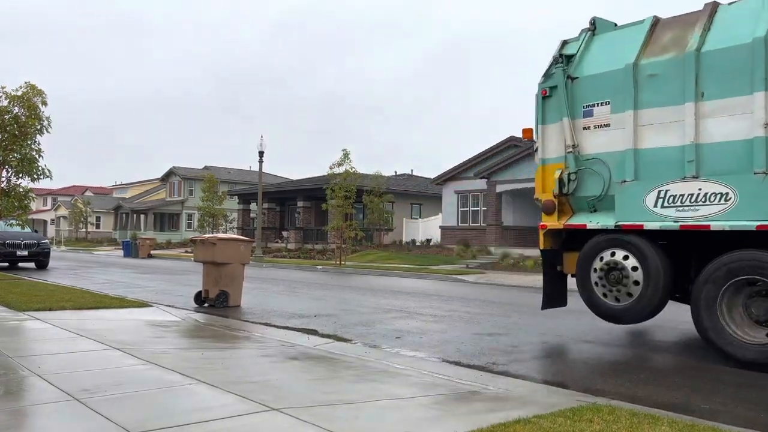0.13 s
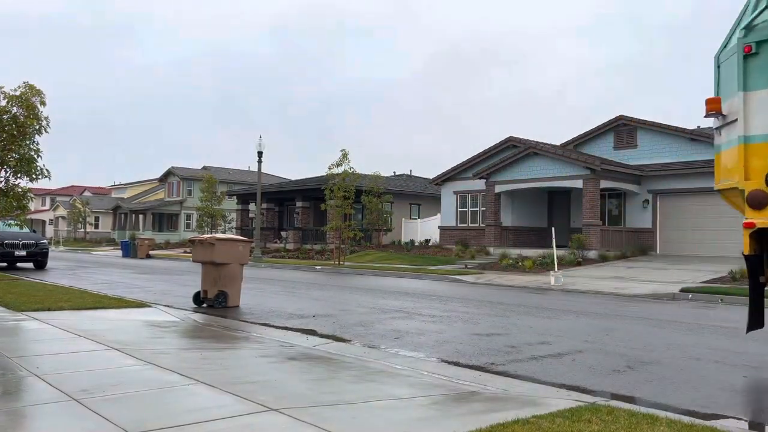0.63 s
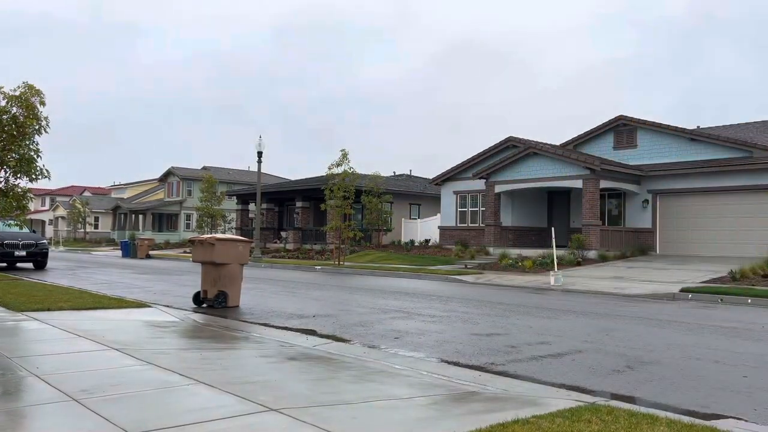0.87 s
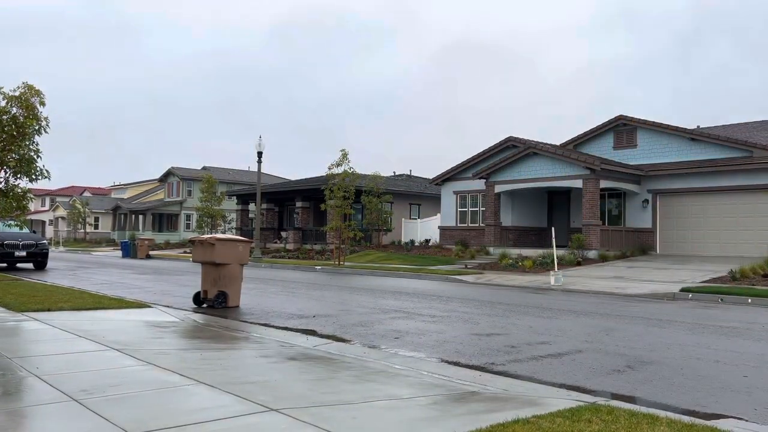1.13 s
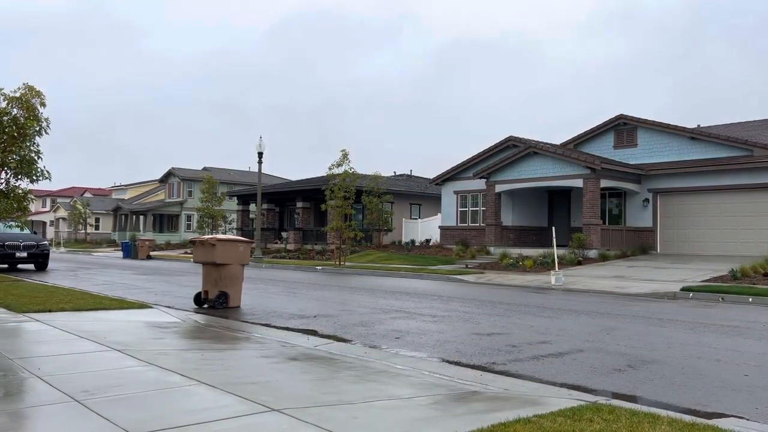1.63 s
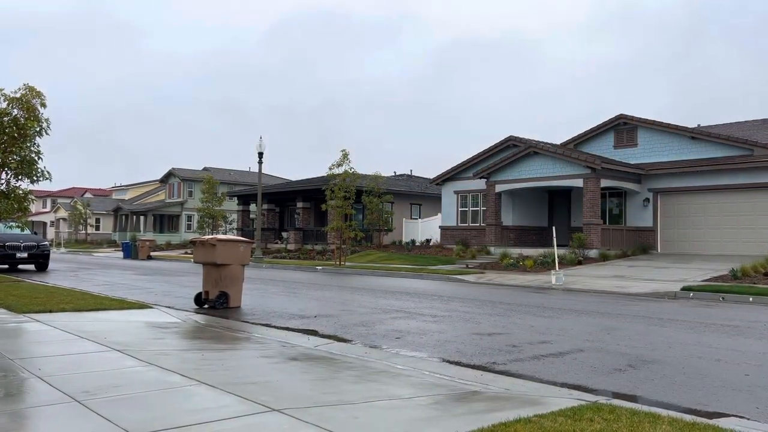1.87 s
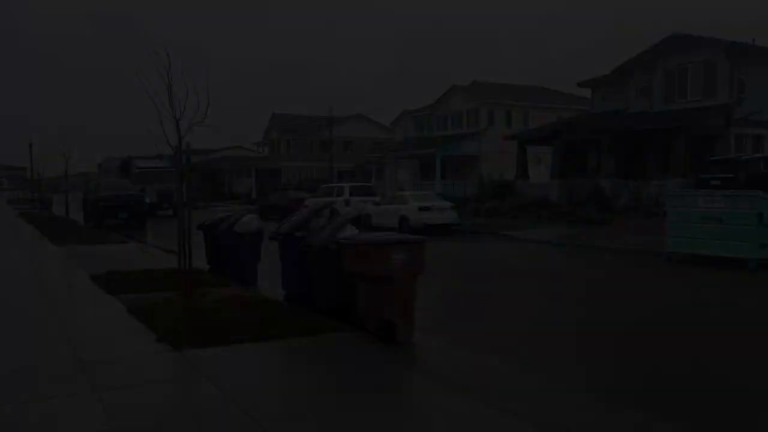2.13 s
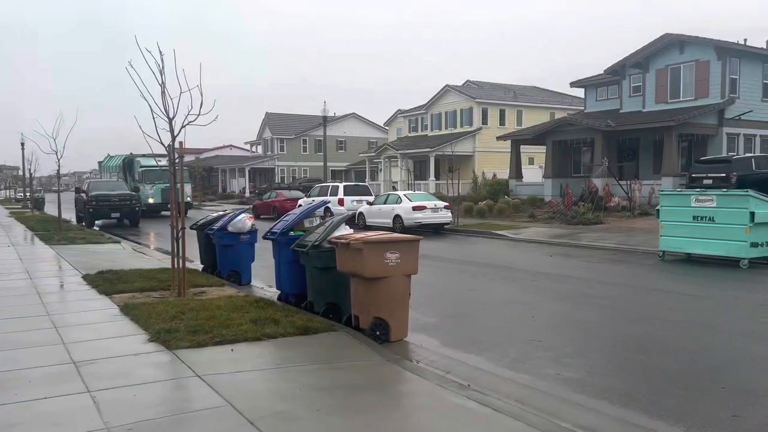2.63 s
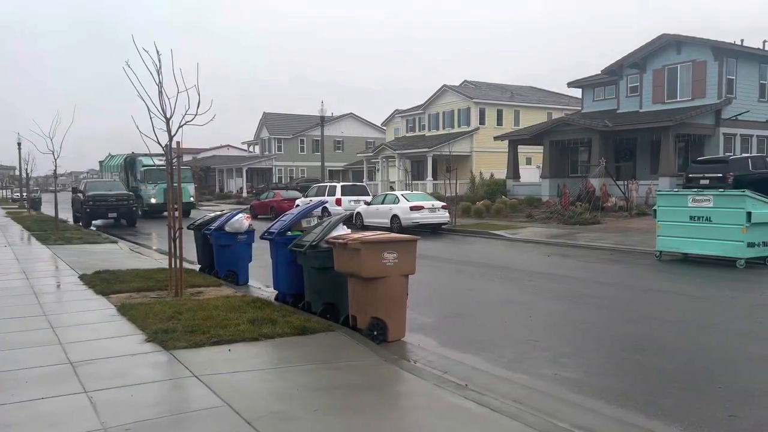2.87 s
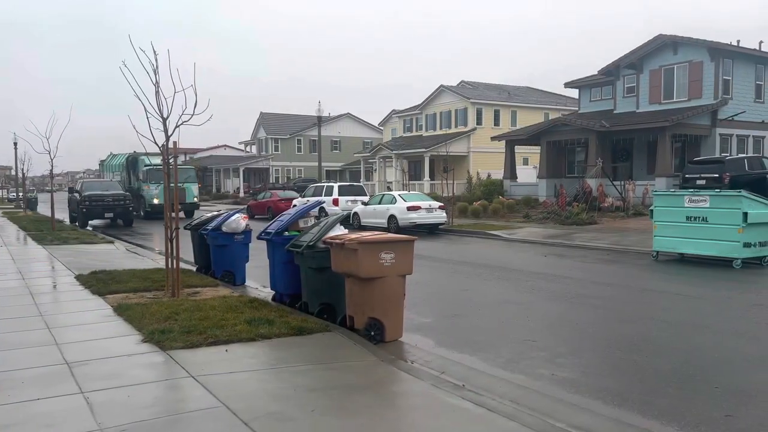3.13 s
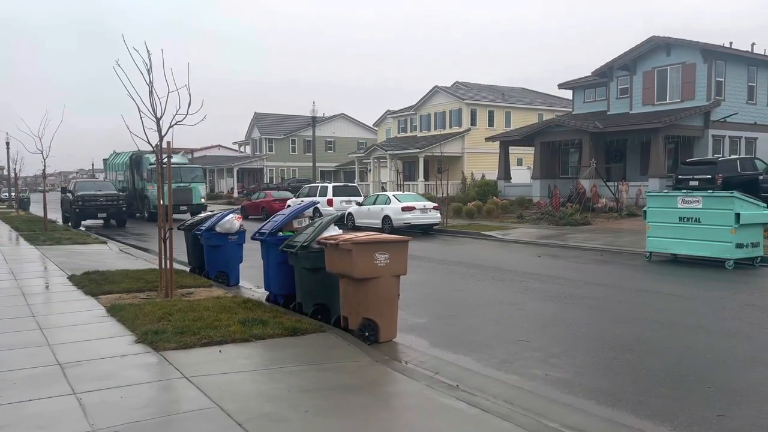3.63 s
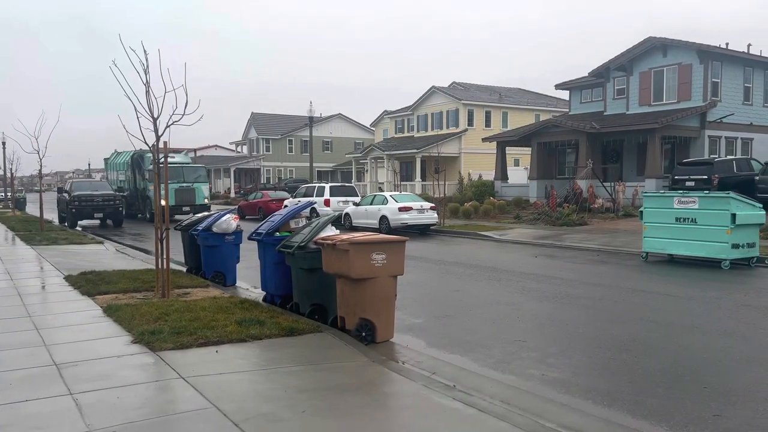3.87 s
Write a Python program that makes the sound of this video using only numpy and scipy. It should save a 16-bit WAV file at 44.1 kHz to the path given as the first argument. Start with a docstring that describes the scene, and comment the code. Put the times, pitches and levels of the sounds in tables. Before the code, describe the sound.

Garbage truck engine roars and whines past nearby, vents air, then cuts to a quieter distant drone

```python
"""Refuse truck leaving, then approaching

A refuse truck drives off along a wet suburban street close by; after a quick fade the same truck
approaches from far away. Engine and hydraulic pump are wavering sines at multiples of their rates, gears and
turbo whine as single lines, fan and tyre roar is noise in flickering bands, short mechanical tones come and go.
Close by, air vents as a noise burst and the brake squeals in gliding tones. Two spaced microphones.
"""
import sys
import numpy as np
from scipy import signal
from scipy.fft import rfft, irfft
from scipy.io import wavfile

SR = 44100
rng = np.random.default_rng(int(sys.argv[2]) if len(sys.argv) > 2 else 0)


def store_wav(level_fs):
    """Save 16-bit WAV to argv[1]."""
    pcm = np.round(np.clip(np.atleast_2d(level_fs), -1, 1) * 32767)
    wavfile.write(sys.argv[1], SR, pcm.T.astype(np.int16))


def elevation(decibels):
    """Turn decibel levels (scalar or array-like) into linear amplitude ratios."""
    levels = np.asarray(decibels, float)
    return 10 ** (levels / 20)


N = 176400

# near noise spectrum before band levels: f/Hz, density/dB re 1 per Hz
NEAR_SPECTRUM = [(35, -65), (60, -51), (120, -50.5), (200, -52), (300, -53.5), (400, -54.5), (600, -59.5),
                 (800, -58.5), (1100, -60), (1400, -60), (1700, -60.5), (2000, -65), (2300, -64),
                 (2600, -68), (3000, -70), (3600, -73), (4300, -71), (5000, -69.5), (5800, -69.5),
                 (6400, -72.5), (7000, -80), (7500, -77), (8500, -78), (9500, -80.5), (10500, -81.5),
                 (11000, -80.5), (11600, -82.5), (12850, -90), (14450, -92), (15700, -92), (15950, -140)]
# near stereo, phase stepped above 9.5 kHz:
# f/Hz, left-right likeness (stereo() caps it), right's phase lead/rad, left minus right/dB
NEAR_STEREO = [(60, 0.9936, 0.15, -0.4), (120, 0.995, 0.45, -1.1), (200, 0.995, 0.8, -1.1),
               (300, 0.9828, 1.2, -2.3), (400, 0.9828, 1.2, -2.3), (600, 0.8856, 2.0, -2.2),
               (800, 0.7776, 2.4, -4.7), (1100, 0.8748, 2.3, -1.5), (1400, 0.7776, 3.0, 1.9),
               (1700, 0.8316, 3.8, 0.2), (2000, 0.2376, 2.0, 1.7), (2300, 0.8316, -0.0, -0.3),
               (2600, 0.6156, -0.2, 1.5), (3000, 0.3564, -3.2, 0.6), (3600, 0.162, -5.5, 1.1),
               (4300, 0.0756, -8.1, 0.2), (5000, 0.1836, -8.1, 2.2), (5800, 0.5184, -6.9, 3.1),
               (6600, 0.2592, -5.7, 2.5), (7500, 0.324, -7.7, -4.9), (8500, 0.3672, -5.4, -3.5),
               (9300, 0.1836, -4.5, -1.4), (9700, 0.995, -3.14, -0.7), (10500, 0.995, -3.14, 0.2),
               (11000, 0.6048, -1.6, 0.0), (11600, 0.995, 0.0, 0.2), (12850, 0.995, 0.0, 0.0),
               (13150, 0.995, 3.14, -0.2), (14450, 0.995, 3.14, 0.4), (14750, 0.995, 6.28, -0.0),
               (15700, 0.995, 6.28, 0)]


def in_time(rows):
    """Columns of a table (first column t/s) at every sample."""
    s, *columns = np.transpose(rows)
    return [np.interp(np.arange(N) / SR, s, c) for c in columns]


def at_hz(rows):
    """Columns of a table (first column f/Hz) at every bin, on a log frequency axis."""
    at, *columns = np.transpose(rows)
    return [np.interp(np.log(np.arange(N // 2 + 1) * SR / N + 1), np.log(at), c) for c in columns]


def drift(pole_hz):
    """Slow chance: noise through two equal poles, spread 1, drawn every 40 samples."""
    r = np.exp(-2 * np.pi * pole_hz * 40 / SR)
    white = rng.standard_normal(N // 40 + 2002)
    slow = signal.lfilter([1], [1, -2 * r, r * r], white)[2000:]  # settled part
    return np.interp(np.arange(N) / 40, np.arange(len(slow)), slow / slow.std())


def turns(hz):
    """Running phase in radians: the integral of frequency."""
    return 2 * np.pi * np.cumsum(hz) / SR


def line(phase, db, waver_db, rough_rad, pole_hz=4.4):
    """A sine around rms level db whose level and phase waver."""
    level = np.sqrt(2) * elevation(db + waver_db * drift(pole_hz))
    return level * np.sin(phase + rough_rad * drift(pole_hz) + rng.uniform(0, 2 * np.pi))


def glide(start_s, length_s, start_hz, end_hz):
    """Envelope and phase of a short gliding tone."""
    u = np.clip((np.arange(N) / SR - start_s) / length_s, 0, 1)
    swell = np.abs(np.sin(np.pi * u)) ** .4 * (u < 1)
    return swell, turns(start_hz + (end_hz - start_hz) * u)


def stereo(pair, shared, own=None):
    """Left and right spectra: a shared one with phase and balance, for noise mixed with their own."""
    alike, lead_rad, balance_db = at_hz(pair)
    alike = np.clip(alike, 0, 0.77)
    left = elevation(balance_db) * np.exp(-.5j * lead_rad)
    right = np.exp(.5j * lead_rad)
    gains = np.sqrt(2 / (1 + elevation(balance_db) ** 2)) * np.array([left, right])  # mean power kept
    if own is None:
        return gains * shared
    return gains * (np.sqrt(alike) * shared + np.sqrt(1 - alike) * own)


def road_echo(x):
    """Adds the dull reflection off the asphalt, closing in on the direct sound as the truck leaves."""
    # t/s, lag/ms
    echo_lag = [(0, 0.97), (.8, 0.62), (1.5, .6), (2.14, 0.21)]
    lag_ms, = in_time(echo_lag)
    dull = signal.sosfiltfilt(signal.butter(2, 2200, fs=SR, output="sos"), x)
    late = np.arange(N) - lag_ms * SR / 1000
    return x + .3 * np.array([np.interp(late, np.arange(N), c) for c in dull])


def roar(spectrum, pair, levels, firing, echo, throb, gust_db, patchy_db):
    """Fan, tyre and combustion noise in flickering half-octave bands, throbbing with the firing."""
    # rattle, extra level around 940 Hz: t/s, level/dB
    rattle_extra = [(0, 3), (.4, 2), (.8, 3), (1.25, -2), (1.7, -3), (2.13, -7.5), (2.15, 0.5), (4, 1.5)]
    # hiss, extra level around 3550 Hz: t/s, level/dB
    hiss_extra = [(0, 2), (.6, 2), (.95, 0.5), (1.1, -3), (1.6, -3.5), (2.13, -3), (2.15, 0), (4, 0.5)]
    level_db, bass_db, middle_db, treble_db, top_db = in_time(levels)
    rattle_db, = in_time(rattle_extra)
    hiss_db, = in_time(hiss_extra)

    pulse = np.sin(firing) + .7 * np.sin(firing / 2) + .7 * np.sin(firing / 3)
    white = rng.standard_normal((3, N)) * (1 + throb * pulse)
    white = rfft(road_echo(white) if echo else white) * np.sqrt(SR / 2)  # white noise to unit density per Hz
    both = elevation(at_hz(spectrum)[0]) * stereo(pair, white[0], white[1:])

    gust = .4 * drift(5.) + drift(14.)
    place = np.log2(np.arange(N // 2 + 1) * SR / N / 40 + 1e-9) * 2  # half-octaves above 40 Hz
    out = 0
    for k in range(18):
        centre_hz = 40 * 2 ** (k / 2)
        band_db = level_db + bass_db / (1 + (centre_hz / 500) ** 2)
        band_db = band_db + middle_db * np.exp(-(np.log(centre_hz / 2500) / .3) ** 2)
        band_db = band_db + rattle_db * np.exp(-(np.log(centre_hz / 940) / 0.68) ** 2)
        band_db = band_db + hiss_db * np.exp(-(np.log(centre_hz / 3550) / .25) ** 2)
        band_db = band_db + treble_db / (1 + (8500 / centre_hz) ** 4)
        band_db = band_db + top_db / (1 + (13500 / centre_hz) ** 10)
        band_db = band_db + gust_db * gust / (1 + (3000 / centre_hz) ** 2) + patchy_db * drift(19.0)
        mask = np.cos(np.pi / 2 * np.clip(np.clip(place, 0, 17) - k, -1, 1)) ** 2
        out = out + elevation(band_db) * irfft(both * mask, N)
    return out


def orders(phase, lines, level_db, waver_db, rough_rad):
    """Engine or pump hum: lines at multiples of one rotating phase."""
    return sum(line(k * phase, db + level_db, waver_db, rough_rad) for k, db in lines)


def gear_whine(firing, gear_db):
    """Gear line at a fixed multiple of the firing, beating once a crank turn (three firings)."""
    # t/s, beat depth/share
    beat_depth = [(0, .85), (.35, .8), (.5, .4), (1.0, .2), (4, .15)]
    beat = 1 + in_time(beat_depth)[0] * np.sin(firing / 3 + drift(3.))
    return beat * line(22.87 * firing, gear_db, 2., .4, 9.)


def turbo_whistle():
    """One rough, falling high line."""
    # t/s, f/Hz, level/dB rms
    whistle = [(0, 7760, -43), (.15, 7690, -41), (.4, 7620, -46), (.7, 7520, -52), (.95, 7400, -60),
               (1.2, 7260, -56), (1.27, 7230, -48), (1.6, 7200, -50), (1.75, 7190, -60), (2.14, 7180, -62)]
    turbo_hz, turbo_db = in_time(whistle)
    return line(turns(turbo_hz), turbo_db, 3., 1.1, 30.)


def brief_tones(rows):
    """Short mechanical tones, nearly clean, some gliding."""
    out = 0
    for *shape, db in rows:
        swell, phase = glide(*shape)
        out = out + swell * line(phase, db, 1.5, .25, 10.)
    return out


def vent():
    """A burst of compressed air: coloured noise with sudden start, short hold, dying tail."""
    start_s, attack_s, hold_s, drive_db = 0.664, 0.013, 0.11, -28
    t = np.arange(N) / SR - start_s
    # 14 dB/s from the start, a further 60 dB per 0.9 s after the hold
    fall_db = 14 * np.clip(t, 0, 9) + 60 * np.clip(t - hold_s, 0, 9) / 0.9
    shape = np.clip(t / attack_s, 0, 1) * elevation(1.8 * drift(20.) + drive_db - fall_db)
    hz = np.arange(N // 2 + 1) * SR / N
    colour = 1 / (1 + (5800 / (hz + 1)) ** 4) / (1 + (hz / 12500) ** 6)
    colour = colour * (hz < NEAR_SPECTRUM[-1][0])
    colour = colour * (1 + 1.2 * np.exp(-((hz - 5900) / 600) ** 2))
    white = rfft(rng.standard_normal((3, N)) * shape) * colour
    return irfft(stereo(NEAR_STEREO, white[0], white[1:]), N)


def squeals():
    """Brake squeals: short, rough falling tones with an octave overtone."""
    # start/s, length/s, start f/Hz, end f/Hz, level/dB rms before the swell, overtone re tone/dB
    squeal_tones = [(1.097, .036, 4960, 4870, -34, -20), (1.136, .042, 4870, 4800, -34, -13),
                    (1.178, .04, 4790, 4730, -38, -10), (1.455, .06, 8250, 8200, -46, -30)]
    # stereo phase and balance of the squeals:
    # f/Hz, likeness (unused for tones), right's phase lead/rad, left minus right/dB
    squeal_stereo = [(4900, 1, -8.1, 2.2), (8200, 1, -6, -3.5), (9400, 1, -6.28, 0)]
    out = 0
    for *shape, db, over_db in squeal_tones:
        swell, phase = glide(*shape)
        phase = phase + .5 * drift(30.)
        tone = line(phase, db, 1.5, .2, 35.)
        overtone = line(2 * phase, db + over_db, 1.5, .2, 35.)
        out = out + swell * (tone + overtone)
    return irfft(stereo(squeal_stereo, rfft(out)), N)


def near():
    """The truck close by, driving off: hum, whine and throb follow the engine's firing and the pump."""
    # t/s, firing rate/Hz
    firing_rate = [(0, 83.7), (.3, 85.84), (.6, 86.5), (.9, 88.1), (1.15, 88.07), (1.3, 85.36),
                   (1.5, 80.76), (1.8, 78.1), (2.14, 74.55)]
    # t/s, pump turns/Hz
    pump_rate = [(0, 50.9), (.36, 53.07), (.8, 52.78), (1.15, 52.98), (1.3, 51.86), (1.6, 48.18),
                 (1.9, 46.33), (2.14, 45.62)]
    # multiple of rate, level/dB before the roar's level and bass are added
    engine_lines = [(1.5, -61), (2.0, -38.5), (3.0, -39), (4.0, -39), (5.0, -42.5), (9.72, -44.5)]
    pump_lines = [(1.0, -31), (3.0, -38.5), (5.0, -42.5), (7.0, -38.5)]
    # t/s, level/dB rms: firing line, pump's 2nd and 4th orders, gear line before its beat
    firing_level = [(0, -24), (.4, -25.5), (.8, -26), (1.25, -24.5), (1.4, -28), (1.62, -36), (1.84, -22.5),
                    (2.14, -45)]
    pump_second = [(0, -29), (.2, -28), (.45, -30), (.6, -24.5), (.78, -31), (.9, -24), (1.28, -25),
                   (1.36, -38), (1.48, -31), (1.7, -35.5), (2.14, -33)]
    pump_fourth = [(0, -25), (.3, -16), (.55, -20.5), (.8, -34), (1.03, -27), (1.11, -29.5), (1.2, -20),
                   (1.32, -29), (1.5, -59), (1.62, -23), (1.9, -39), (2.1, -23.5)]
    gear_level = [(0, -43), (.14, -37), (.2, -33), (.3, -35), (.5, -35), (.62, -40), (.78, -49), (.81, -34),
                  (.86, -33), (.9, -48), (1.2, -47), (1.3, -43), (1.45, -42), (1.7, -45), (2.14, -49)]
    # t/s, level/dB, then extra/dB: bass, around 2.5 kHz, treble, top
    roar_levels = [(0, -0.5, 2.5, 0.23, 7.5, 3), (0.301, 0, 1.5, 0.17, 3, 2), (.6, 0, 1, -1, -3, 5),
                   (.9, 0, 1.5, 0.68, -2, 11), (1.08, 0.9, -0.5, 0.17, -8.5, 12),
                   (1.2, 0.8, 0, 0.55, -5.5, 6), (1.5, 0.6, -0.5, 1.5, -8, -7),
                   (1.8, 1, -4.5, -0.37, -7.5, -12), (2.14, 1, -6, 1.3, -10, -6)]
    # start/s, length/s, start f/Hz, end f/Hz, level/dB rms before the swell
    short_tones = [(-.05, .2, 970, 990, -32), (-.05, .2, 822, 826, -35), (.15, .17, 975, 950, -37),
                   (.44, .07, 1180, 1175, -34), (.44, .07, 1005, 1000, -33), (.37, .07, 1710, 1705, -35),
                   (.56, .19, 850, 845, -35), (.6, .1, 1770, 1765, -36), (.97, .17, 262, 268, -27),
                   (1.17, .22, 510, 440, -30), (1.22, .2, 345, 330, -29), (1.3, .14, 415, 395, -31),
                   (1.45, .1, 680, 625, -35), (1.74, .24, 315, 300, -32), (-.05, .35, 167, 160, -29),
                   (.28, .34, 130, 128, -29), (.7, .27, 266, 264, -32), (1.53, .3, 162, 155, -29),
                   (1.95, .13, 592, 582, -40)]

    firing, pump = turns(in_time(firing_rate)[0]), turns(in_time(pump_rate)[0])
    level_db, bass_db, *_ = in_time(roar_levels)
    noise = roar(NEAR_SPECTRUM, NEAR_STEREO, roar_levels, firing, echo=True,
                 throb=0.05, gust_db=0.7, patchy_db=0.8)
    tones = line(firing, in_time(firing_level)[0], 1.25, .3)
    tones = tones + orders(firing, engine_lines, level_db + bass_db, 2.5, .3)
    tones = tones + orders(pump, pump_lines, level_db + bass_db, 2.5, .3)
    tones = tones + line(2 * pump, in_time(pump_second)[0], 1., .2)
    tones = tones + line(4 * pump, in_time(pump_fourth)[0], 1., .2)
    tones = tones + gear_whine(firing, in_time(gear_level)[0])
    tones = tones + turbo_whistle() + brief_tones(short_tones)
    return irfft(stereo(NEAR_STEREO, rfft(tones)), N) + noise + vent() + squeals()


def far():
    """The truck down the street: engine, pump, gear, roar, short tones; no echo, turbo, vent or brake."""
    # t/s, firing rate/Hz
    firing_rate = [(2.14, 78.2), (2.45, 77.6), (2.9, 78.8), (3.25, 79.4), (3.6, 80), (4, 80.2)]
    # t/s, pump turns/Hz
    pump_rate = [(2.14, 48.2), (3, 47.26), (4, 48.2)]
    # multiple of rate, level/dB before the roar's level and bass are added
    engine_lines = [(1.5, -45), (2.0, -34.5), (4.0, -47.5), (9.9, -53)]
    pump_lines = [(1.0, -44.5), (2.0, -44.5)]
    # t/s, level/dB rms: firing line, gear line before its beat
    firing_level = [(2.14, -29.5), (2.5, -29), (2.8, -31.5), (3.05, -32.5), (3.5, -29), (4, -30.5)]
    gear_level = [(2.14, -47), (2.45, -45), (2.9, -49.5), (3.1, -46), (3.3, -41), (3.55, -48), (3.75, -44),
                  (3.9, -38.5), (4, -45)]
    # t/s, level/dB, then extra/dB: bass, around 2.5 kHz, treble, top
    roar_levels = [(2.14, 0.57, -2, 0.4, -1.33, 0.), (2.6, 0.64, -2, 0.19, -2.2, 0.),
                   (3.0, 0.23, -1.2, -0.32, 0.27, 0.093), (3.5, 0.55, 1.2, 0.15, 0.16, 0.00091),
                   (4, 1.9, 0.6, -0.81, 2.5, 0.)]
    # noise spectrum before band levels: f/Hz, density/dB re 1 per Hz
    far_spectrum = [(35, -73), (60, -71), (120, -60.5), (200, -59.5), (300, -60.5), (400, -66.5),
                    (600, -76.5), (800, -70), (1100, -70.5), (1400, -71), (1700, -68), (2000, -70.5),
                    (2300, -74), (2600, -76.5), (3000, -84.5), (3600, -86.6), (4300, -82.5), (5000, -79),
                    (5800, -81), (6600, -84.5), (7500, -93), (8500, -93), (9300, -95), (9700, -103),
                    (10500, -103), (11000, -97), (11600, -97.5), (12850, -106.7), (13150, -106.5),
                    (14450, -111.7), (14750, -131.5), (15700, -145.2)]
    # far stereo, phase stepped above 9.5 kHz:
    # f/Hz, left-right likeness (stereo() caps it), right's phase lead/rad, left minus right/dB
    far_stereo = [(60, 0.995, -0.1, -2.8), (120, 0.995, -0.2, -2.8), (200, 0.995, -0.3, -2.8),
                  (300, 0.9396, -0.7, -2.8), (400, 0.9396, -0.7, -2.8), (600, 0.5832, -2.2, 3.1),
                  (800, 0.702, -1.2, 4.7), (1100, 0.7452, -1.8, 3.9), (1400, 0.1944, -1.3, -1.4),
                  (1700, 0.918, 1.3, 1.9), (2000, 0.6912, -0.6, 0.0), (2300, 0.6264, -3.4, -4.0),
                  (2600, 0.5616, -0.9, -0.2), (3000, 0.4104, 2.1, 0.5), (3600, 0.324, 3.5, 0.3),
                  (4300, 0.6912, 5.0, 3.8), (5000, 0.324, 3.2, 17.1), (5800, 0.1404, 2.6, 19.5),
                  (6600, 0.6696, 1.9, 12.5), (7500, 0.3888, -1.2, 5.0), (8500, 0.6264, 0.0, 8.1),
                  (9300, 0.54, 2.2, 2.4), (9700, 0.995, 3.14, 0.0), (10500, 0.995, 3.14, -0.0),
                  (11000, 0.5292, 4.1, -0.6), (11600, 0.995, 6.28, 0.0), (12850, 0.995, 6.28, -0.2),
                  (13150, 0.995, 9.42, 0.3), (14450, 0.995, 9.42, 0.1), (14750, 0.995, 6.28, 1.0)]
    # start/s, length/s, start f/Hz, end f/Hz, level/dB rms before the swell
    short_tones = [(2.35, .3, 308, 318, -41), (2.85, .5, 191, 192, -36), (3.6, .45, 218, 221, -36),
                   (3.6, .45, 238, 242, -40), (3.4, .15, 1605, 1610, -47)]

    firing, pump = turns(in_time(firing_rate)[0]), turns(in_time(pump_rate)[0])
    level_db, bass_db, *_ = in_time(roar_levels)
    noise = roar(far_spectrum, far_stereo, roar_levels, firing, echo=False,
                 throb=0.078, gust_db=1.13, patchy_db=0.34)
    tones = line(firing, in_time(firing_level)[0], 0.75, .15)
    tones = tones + orders(firing, engine_lines, level_db + bass_db, 1.5, .15)
    tones = tones + orders(pump, pump_lines, level_db + bass_db, 1.5, .15)
    tones = tones + gear_whine(firing, in_time(gear_level)[0]) + brief_tones(short_tones)
    return irfft(stereo(far_stereo, rfft(tones)), N) + noise


def scene():
    """The near view fades out, the far view fades in, overlapping by 3.8 ms."""
    cut_s, fade_out_s, fade_in_s = 2.138, 0.033, 0.034
    t = np.arange(N) / SR - cut_s
    fade_out = np.clip(-t / fade_out_s, 0, 1) ** 1.03
    fade_in = np.clip((t + 0.0038) / fade_in_s, 0, 1) ** 1.65
    return near() * fade_out + far() * fade_in


def top_cut(x):
    """Nothing passes above the cut-off."""
    return signal.sosfilt(signal.butter(12, 17060, fs=SR, output="sos"), x)


def record(dry):
    """The microphones lose the deepest bass, below 32 Hz."""
    low_cut = signal.butter(4, 32, "high", fs=SR, output="sos")
    return top_cut(signal.sosfilt(low_cut, dry))


dry = scene()
out = record(dry)
store_wav(out)
```